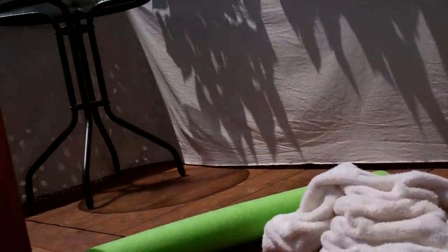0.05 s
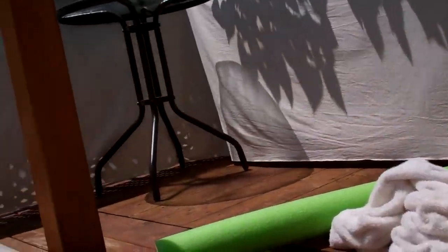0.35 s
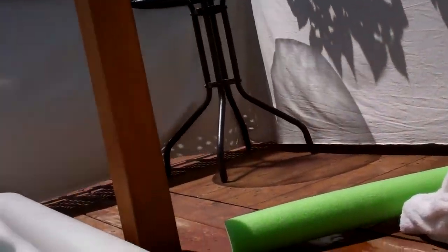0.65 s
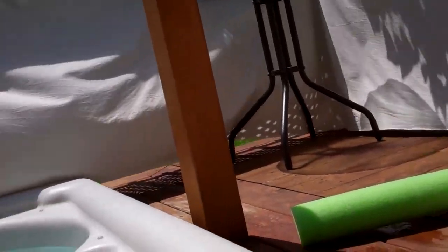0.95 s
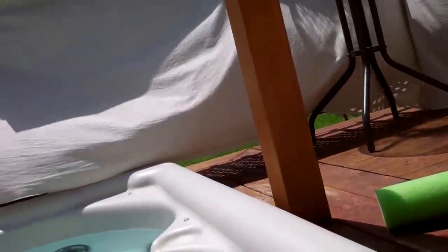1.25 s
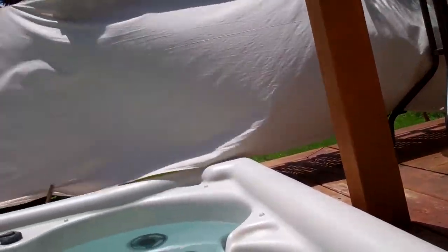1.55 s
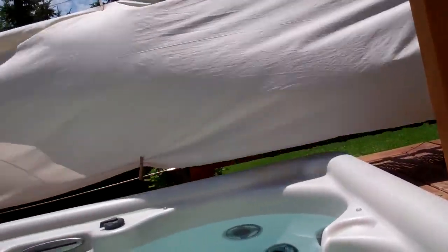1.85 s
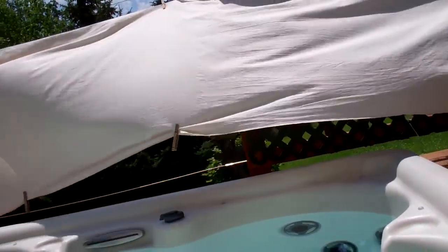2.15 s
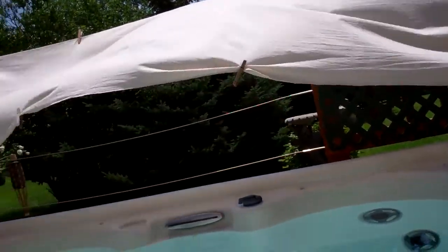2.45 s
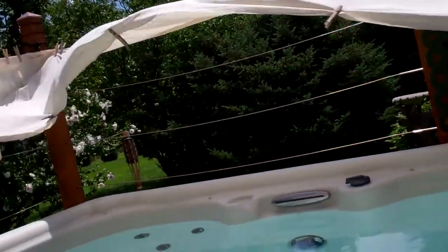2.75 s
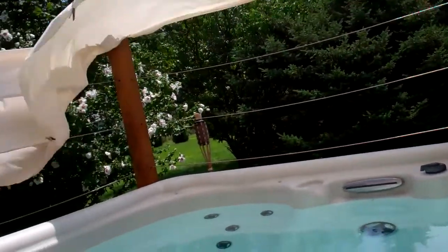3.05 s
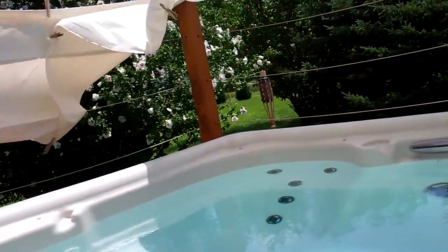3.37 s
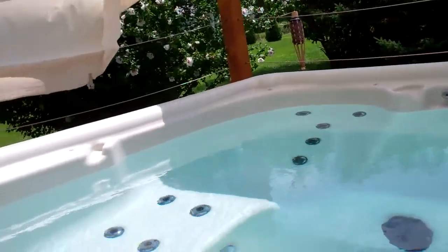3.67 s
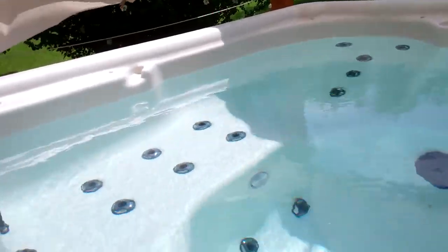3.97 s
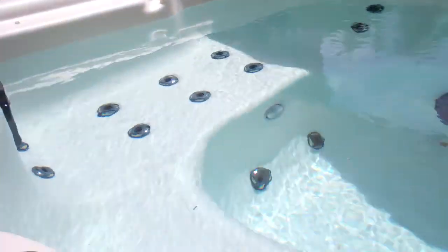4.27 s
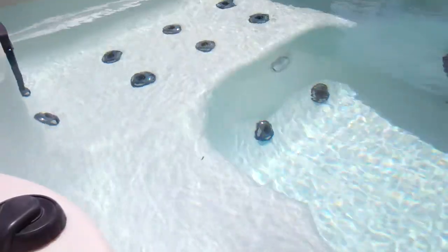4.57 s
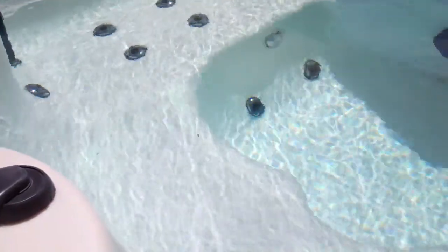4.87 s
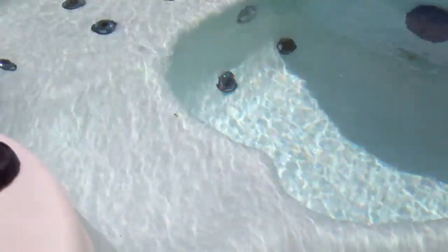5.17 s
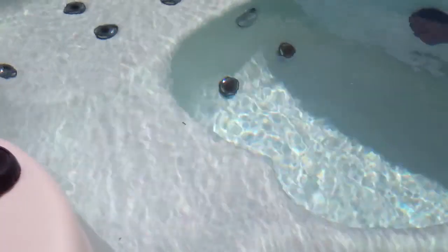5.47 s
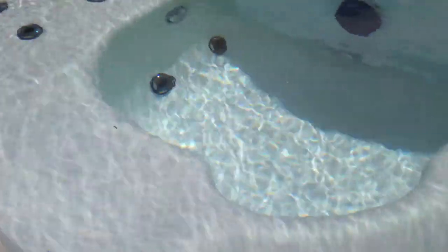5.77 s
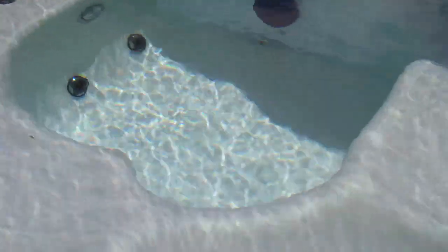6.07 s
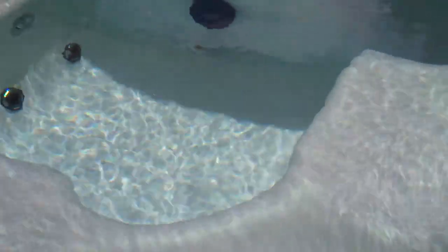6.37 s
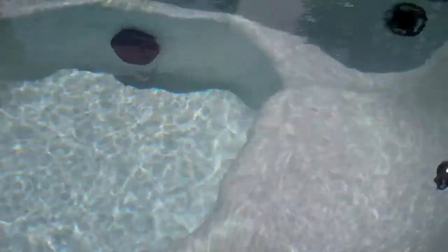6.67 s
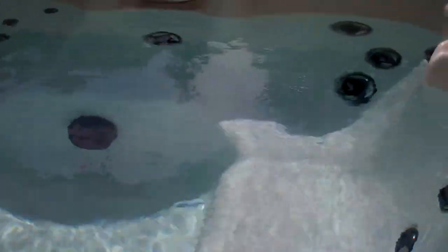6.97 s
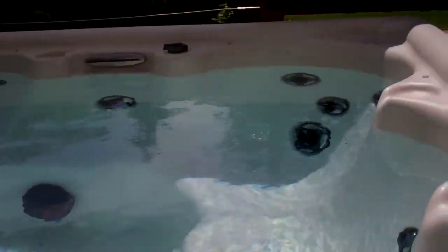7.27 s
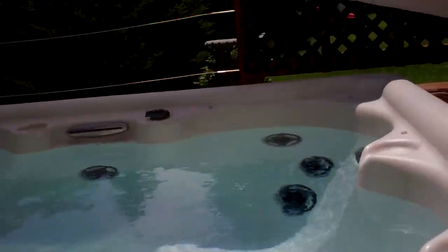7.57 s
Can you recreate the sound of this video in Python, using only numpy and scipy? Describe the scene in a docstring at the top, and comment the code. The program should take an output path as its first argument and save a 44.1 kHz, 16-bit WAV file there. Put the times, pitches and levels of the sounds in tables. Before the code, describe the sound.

Gusty wind hits a microphone carried across an outdoor deck, its low rumble and thumps jumping between left and right. The gusts begin lightly, build to loud pops and crackle, then weaken. Much quieter, hung sheets snap and rustle close by and a few small knocks sound early on. Behind it all lie a soft garden hiss, an insect rasping on and off and, at the close, a faint far bird.

```python
"""A sunny deck: gusty wind buffets the two microphone ports of a camera carried across it.
Gusts ride on a slow breeze; their eddies rumble in each port separately, and the hardest vortices pop.
Hung sheets flap and rustle nearby, with a few small knocks. Behind them lie a soft outdoor wash and
hiss, a rasping insect, a far bird and one thin whine.
The camera's limiter ducks everything after each hard blow on the right port."""
import sys
import numpy as np
from scipy import signal
from scipy.fft import rfft, irfft
from scipy.io import wavfile
from scipy.ndimage import uniform_filter1d, minimum_filter1d

SR = 44100
rng = np.random.default_rng(int(sys.argv[2]) if len(sys.argv) > 2 else 0)


def store_pcm(level_fs):
    """Save levels as 16-bit WAV."""
    pcm = np.round(np.clip(level_fs, -1, 1) * 32767).astype(np.int16)
    wavfile.write(sys.argv[1], SR, np.atleast_2d(pcm).T)


N = 340452
T = np.arange(N) / SR
HZ = np.fft.rfftfreq(N, 1 / SR)
BAND_EDGE_HZ = 14380


def amp(db):
    """Decibels to gain."""
    return 10 ** (np.asarray(db) / 20)


def unit_rms(x):
    """Scale to rms 1."""
    return x / np.sqrt(np.mean(x ** 2) + 1e-20)


def time_curve(rows):
    """Time table, interpolated at every sample."""
    return np.interp(T, *np.transpose(rows))


def freq_curve(rows, hz=HZ):
    """Frequency table, interpolated on a log axis."""
    f, value = np.transpose(rows)
    return np.interp(np.log(hz + 1), np.log(f), value)


def noise(colour, correlation=0):
    """Stereo noise, rms 1, of given spectrum and left-right correlation."""
    left, other = rng.standard_normal((2, 2 * len(HZ))).view(complex)
    right = correlation * left + np.sqrt(1 - correlation ** 2) * other
    return unit_rms(irfft(np.array([left, right]) * colour, N))


def short_noise(colour, samples):
    """Block of coloured noise, rms 1, independent per port."""
    return unit_rms(irfft(rfft(rng.standard_normal((2, samples))) * colour))


def flicker(rate_hz, points=4096):
    """Random wander up to rate_hz, rms 1, independent per port."""
    hz = np.fft.rfftfreq(points, T[-1] / points)
    wander = short_noise(1 / (1 + (hz / rate_hz) ** 4), points)
    return np.array([np.interp(T, np.linspace(0, T[-1], points), port) for port in wander])


def swell(start_s, length_s):
    """Half-ellipse envelope."""
    return np.sqrt(np.maximum(1 - (2 * (T - start_s) / length_s - 1) ** 2, 0))


def port_gains(pan_db):
    """Left and right gains; pan_db is left minus right."""
    return amp(np.minimum([[pan_db], [-pan_db]], 0))


def add(mix, start_s, sound):
    """Mix in a short stereo sound."""
    part = mix[:, round(start_s * SR):][:, :sound.shape[1]]
    part += sound[:, :part.shape[1]]


def wind_level_db(attack_s=0.0031, release_s=0.0087, sag_db=-3):
    """Flow at each port: every gust jumps out of the breeze, sags and drops back."""
    # breeze between gusts: t/s, level/dB
    breeze = [(0.8, -77), (1.02, -54), (1.8, -55.5), (1.9, -45), (2.75, -39), (3.35, -35.5), (3.45, -50),
              (3.75, -48.5), (4.1, -31), (4.65, -45), (5.02, -19.5), (5.22, -35.5), (5.4, -28), (5.6, -46),
              (5.72, -37.5), (6.3, -46.5), (7.4, -40), (7.7, -56.5)]
    # gusts: t/s, length/s, level/dB, pan/dB
    gusts = [(1.871, 0.29, -32.5, -2.5), (2.352, 0.089, -31, 1.5), (2.51, 0.24, -31, -1),
             (2.889, 0.038, -27, -22), (2.906, 0.1, -30, 22.5), (3.27, 0.04, -28.5, 17),
             (3.51, 0.084, -30.5, 6.5), (3.836, 0.23, -30, 25), (3.95, 0.08, -19, 12),
             (4.238, 0.066, -30.5, 5), (4.341, 0.33, -32.5, 1), (4.503, 0.12, -14, -7),
             (4.714, 0.048, -18, 1.5), (4.8, 0.022, -21, -8), (4.885, 0.053, -16, -1),
             (4.932, 0.06, -20.5, 2), (5.402, 0.052, -16.5, -4.5), (5.493, 0.19, -23, -2.5),
             (5.654, 0.0096, -10.5, 6), (5.797, 0.062, -28.5, 2), (5.935, 0.17, -34.5, -1.5),
             (6.135, 0.096, -27.5, 7.5), (6.387, 0.35, -34, -2.5), (6.956, 0.29, -32.5, 22)]
    power = amp(time_curve(breeze)) ** 2 * np.ones((2, 1))
    t = np.arange(SR // 2) / SR
    for start_s, length_s, db, pan_db in gusts:
        envelope = np.minimum(t / attack_s, 1) * np.exp(-np.maximum(t - length_s, 0) / release_s)
        gust = envelope * amp(db + sag_db * t / length_s) * port_gains(pan_db)
        add(power, start_s, gust ** 2)
    return 10 * np.log10(power)


def turbulence(trim_db=-1, breakup_db=-30, breakup_corner_hz=245, low_hz=125, tilt_db_per_oct=-3.5):
    """Eddies swell and collapse at each port; faster air sheds smaller ones, so the rumble brightens."""
    decimation = 4
    eddies_db = 4 * np.clip(flicker(rate_hz=55), -2, 2)
    lulls_db = 2 * np.minimum(flicker(rate_hz=24)[0], 0) + 2.5  # flow briefly lets go of both ports
    flow_db = (wind_level_db() + eddies_db + lulls_db)[:, ::decimation]
    # the fastest flow breaks into fine, crackling eddies: higher corner, shallower roll-off
    relative_db = flow_db - breakup_db
    excess_db = np.maximum(relative_db, 0)
    corner_hz = breakup_corner_hz * 2 ** (relative_db / 48 + excess_db / 36)
    order = 3.45 / (1 + excess_db / 55)
    spectrum = rfft(rng.standard_normal(flow_db.shape))
    bin_octave = np.log2(HZ[:spectrum.shape[1]] + 1)
    rumble, power = 0, 0
    for octave in range(4, 13):
        band = irfft(spectrum * np.maximum(1 - abs(bin_octave - octave), 0), N // decimation)
        hz = 2. ** octave
        high_pass = hz ** 2 / (hz ** 2 + low_hz ** 2)
        gain = amp(tilt_db_per_oct * octave) * high_pass / np.sqrt(1 + (hz / corner_hz) ** (2 * order))
        rumble += gain * band
        power += gain ** 2 * band.var() * 1.5  # 1.5: band overlap
    return signal.resample_poly(amp(flow_db + trim_db) * rumble / np.sqrt(power), decimation, 1, axis=1)


def buffets(skew=0.25, ragged=0.32, wake_db=-8, wake_s=0.004, wake_order=3.85, crack_hz=700):
    """A vortex core is a brief lopsided suction between two pushes, in a burst of smaller eddies."""
    # vortices hitting a port: t/s, level/dB, centre f/Hz, pan/dB
    vortices = [(1.2707, -23.5, 208, -8), (1.72, -28, 176, 18), (1.943, -10.5, 274, 7.5),
                (1.967, -10, 323, -11), (2.2724, -17.5, 230, 28), (2.563, -17.5, 260, -22),
                (2.602, -13.5, 282, -19), (2.6219, -6, 327, -17), (2.6505, -8, 304, -30),
                (2.679, -10, 292, -7), (2.9016, -14.5, 374, -33), (3.047, -16, 260, -1),
                (3.15, -19.5, 240, -18), (3.271, -16.5, 318, -11), (3.299, -15.5, 298, 21),
                (3.5683, -17, 430, 24), (3.856, -6.5, 400, 46), (3.967, -9, 260, 20),
                (3.9867, -10, 243, 18), (3.997, -7.5, 760, 25), (4.0057, -8.5, 407, 25),
                (4.0097, -4.5, 380, -23), (4.0163, -2.5, 780, -11), (4.2585, -12, 284, 15),
                (4.302, -15, 314, 17), (4.3683, -22, 290, -12), (4.4118, -2.5, 315, 16),
                (4.414, -9, 490, -27), (4.5121, -9.5, 400, 5), (4.572, -1, 627, -14),
                (4.609, -18, 1300, 20), (4.687, -9, 305, 13), (4.7293, 0, 820, -20), (4.738, -7, 560, -2),
                (4.886, -6, 240, 18), (4.902, 0.5, 680, -7), (4.9152, 7, 580, -24), (4.928, 1, 590, -11),
                (4.9553, -5, 695, 25), (5.003, 6.5, 760, -10), (5.017, -1.5, 744, -23),
                (5.0622, -6, 1070, 13), (5.423, -2, 202, 8), (5.4381, -8, 443, 7), (5.4628, -1, 363, 16),
                (5.515, -11, 470, 7), (5.5474, 0.5, 252, 11.5), (5.558, -7, 426, 19), (5.572, 2, 604, -38),
                (5.5742, -18, 2480, -25), (5.6095, -3.5, 455, -17), (5.6672, -6.5, 666, -5.5),
                (5.831, -9, 424, 3.5), (6.0764, -11.5, 380, -21), (6.189, -18, 300, 20),
                (6.371, -13.5, 455, 30), (6.471, -15.5, 300, 9), (6.578, -17, 232, -5),
                (6.821, -15, 220, 20), (7.206, -19, 216, 25)]
    out = np.zeros((2, N))
    t = np.arange(-1024, 1024) / SR
    f = np.fft.rfftfreq(len(t), 1 / SR)
    for centre_s, db, hz, pan_db in vortices:
        u = np.pi * hz * t
        core = (1 - 2 * u ** 2 + 2 * skew * rng.standard_normal() * u) * np.exp(-u ** 2)
        # the fastest vortices have a sharp tip, which cracks
        tip_u = 2.24 * u
        tip_gain = amp(-14) * min(hz / crack_hz, 1) ** 3
        tip = tip_gain * (1 - 2 * tip_u ** 2) * np.exp(-tip_u ** 2)
        colour = f / (f + hz) / np.sqrt(1 + (f / (1.04 * hz)) ** (2 * wake_order))
        eddies = short_noise(colour, len(t))
        wake = amp(wake_db) * eddies * np.exp(-(t / wake_s) ** 2)
        pop = wake - tip - core * (1 + ragged * eddies)
        polarity = np.copysign(1, [[pan_db], [-pan_db]])  # weaker port inverted
        add(out, centre_s + t[0], amp(db) * port_gains(pan_db) * polarity * pop)
    return out


def microphone(wind, clip_db=8.5, low_cut_hz=46):
    """The hardest blows drive the microphone to its stop and crackle; the deepest rumble is lost."""
    clipped = np.clip(wind, -amp(clip_db), amp(clip_db))
    return signal.sosfilt(signal.butter(2, low_cut_hz, "high", fs=SR, output="sos"), clipped)


def sheets(rise_s=0.000095, body_db=11.5, relative_width=0.29):
    """Cloth snaps taut: short puffs of broad noise, each with one soft resonance."""
    # flaps, ticks, swishes: t/s, level/dB, decay/s, body f/Hz
    flaps = [(1.11, -38, 0.0029, 4800), (1.2695, -35, 0.0088, 3500), (1.354, -33, 0.01, 3030),
             (1.695, -43.5, 0.014, 3240), (1.757, -45.5, 0.014, 2190), (2.183, -39, 0.0055, 3300),
             (2.84, -45, 0.024, 2050), (4.268, -38.5, 0.023, 1100), (4.448, -36, 0.061, 1080),
             (5.986, -28, 0.0072, 1390)]
    # flap spectrum: f/Hz, level/dB
    cloth = [(60, -37), (420, 16), (2000, 3), (3400, -0.5), (4800, -6.5), (14000, -9)]
    out = np.zeros((2, N))
    t = np.arange(8192) / SR
    f = np.fft.rfftfreq(len(t), 1 / SR)
    for start_s, db, decay_s, body_hz in flaps:
        resonance_db = body_db / (1 + ((f / body_hz - 1) / relative_width) ** 2)
        puff = short_noise(amp(freq_curve(cloth, f) + resonance_db), len(t))
        envelope = (1 - np.exp(-t / rise_s)) * np.exp(-t / decay_s)
        add(out, start_s, amp(db) * envelope * puff)
    return out


def knocks():
    """Small hollow knocks, perhaps of clothes pegs; all ring with the same modes."""
    # knocks: t/s, level/dB
    hits = [(1.122, -37.5), (1.2704, -33), (2.4762, -26.5)]
    # ringing modes: f/Hz, level/dB, t60/s
    modes = [(1080, -5, 0.027), (1270, -6, .017), (3460, -12, 0.0069)]
    out = np.zeros((2, N))
    t = np.arange(4096) / SR
    ring = sum(amp(db - 60 * t / t60_s) * np.sin(2 * np.pi * hz * t) for hz, db, t60_s in modes)
    for start_s, db in hits:
        add(out, start_s, amp(db) * port_gains(0) * ring)
    return out


def rustles(low_cut_hz=5000):
    """Cloth brushes on cloth: brief puffs of high noise."""
    # cloth contacts: t/s, length/s, level/dB
    brushes = [(1.748, 0.018, -48.5), (4.267, 0.036, -47), (5.496, .042, -47), (6.797, 0.067, -51)]
    envelope = sum(amp(db) * swell(start_s, length_s) for start_s, length_s, db in brushes)
    return envelope * noise(HZ / (HZ + low_cut_hz) * (HZ < BAND_EDGE_HZ))


def whine(start_s=3.125, length_s=0.135, half_width_hz=25, level_db=-48.5):
    """Brief thin whine of three high lines, perhaps the lens motor."""
    # spectral lines: f/Hz, level/dB
    lines = [(9270, -2.5), (10998, -2.5), (13808, 3)]
    colour = sum(amp(db) / (1 + ((HZ - hz) / half_width_hz) ** 2) for hz, db in lines)
    return amp(level_db) * swell(start_s, length_s) * noise(colour)


def insect(rasp_s=0.2, level_db=-55.5, ragged_db=2):
    """Short, ragged rasps of high, narrow noise that swell and fade."""
    # rasp onsets: t/s
    onsets = [-.04, .39, .76, 1.22, 2.03, 2.38, 2.88, 3.43, 6.15, 6.7, 7.25]
    # rasp spectrum: f/Hz, level/dB
    spectrum = [(5000, 4.5), (7000, 13), (8700, 18), (9500, 16), (10400, -15)]
    envelope = sum(swell(start_s, rasp_s) ** 2 for start_s in onsets)
    gain = amp(level_db + ragged_db * flicker(rate_hz=60)[0])
    return envelope * gain * noise(amp(freq_curve(spectrum)), correlation=0.39)


def bird(end_hz=3450):
    """Far bird: each slur holds its top note, falls and levels out, with a slight waver."""
    # falling slurs: t/s, length/s, top f/Hz, level/dB
    slurs = [(7.196, 0.105, 5030, -52), (7.65, 0.034, 4260, -53)]
    out = np.zeros((2, N))
    waver = 1 + 0.042 * flicker(rate_hz=190)
    for start_s, length_s, top_hz, db in slurs:
        progress = np.clip((T - start_s) / length_s, 0, 1)
        fall = np.sin(np.pi / 2 * progress ** 2) ** 2
        hz = (top_hz + (end_hz - top_hz) * fall) * waver
        out += amp(db) * swell(start_s, length_s) * np.sin(2 * np.pi * np.cumsum(hz, axis=1) / SR)
    return out


def outdoor_air(wash_db=-53, hiss_lean_db=0.92):
    """Low wash, alike in both ports, under a wide hiss that leans left; both flicker by about 1 dB."""
    # wash spectrum: f/Hz, level/dB
    wash_spectrum = [(20, -37), (90, 3), (220, 1), (600, -1), (1150, -3), (1700, -13.5), (3000, -12.5),
                     (8000, -24.5)]
    # hiss spectrum: f/Hz, level/dB
    hiss_spectrum = [(3400, 10), (5300, 9.5), (6700, 12), (7600, 9), (8700, 10.5), (10000, 7.5),
                     (14000, 8.5)]
    # hiss envelope: t/s, level/dB
    hiss_levels = [(0, -58), (.75, -56.5), (1.2, -53), (3, -51.5), (3.45, -47.5), (6, -49.5), (7.7, -51.5)]
    # likeness of far sound in the two ports: f/Hz, correlation
    likeness = [(500, 0.95), (1250, 0.78), (2100, -0.09)]
    correlation = freq_curve(likeness)
    wash = noise(amp(freq_curve(wash_spectrum)), correlation)
    wash *= amp(wash_db + flicker(rate_hz=17)[0])
    hiss = noise(amp(freq_curve(hiss_spectrum)) * (HZ < BAND_EDGE_HZ), correlation)
    hiss *= amp(time_curve(hiss_levels) + flicker(rate_hz=14)[0])
    return wash + hiss * amp([[hiss_lean_db], [-hiss_lean_db]])


def limiter(x, threshold_db=-16.5, share=0.88, hold_s=0.046, recover_db_per_s=30, window=176):
    """Keyed by right-port power: both channels duck at once, hold, then recover steadily."""
    level_db = 10 * np.log10(abs(uniform_filter1d(x[1] ** 2, window)) + 1e-12)
    cut_db = share * np.minimum(threshold_db - level_db, 0)
    half_hold = int(hold_s * SR / 2)
    held_db = minimum_filter1d(cut_db, 2 * half_hold + 1, origin=half_hold)
    ramp_db = recover_db_per_s * T
    gain_db = np.minimum.accumulate(held_db - ramp_db) + ramp_db
    return x * amp(uniform_filter1d(gain_db, window))


def scene():
    """Wind at the ports, sheets nearby, garden behind."""
    wind = microphone(turbulence() + buffets())
    laundry = sheets() + knocks() + rustles()
    background = outdoor_air() + insect() + bird() + whine()
    return wind + laundry + background


def record(dry):
    """Limiter, soft ceiling on the largest pops, band limit."""
    ceiling = 0.8
    softened = ceiling * np.tanh(limiter(dry) / ceiling)
    low_pass = signal.firwin(801, BAND_EDGE_HZ, window=("kaiser", 8), fs=SR)
    return signal.oaconvolve(softened, low_pass[None], "same", axes=1)


dry = scene()
out = record(dry)
store_pcm(out)
```